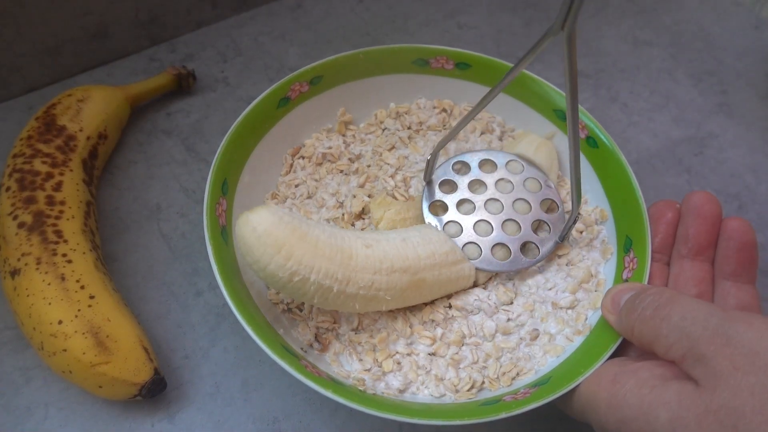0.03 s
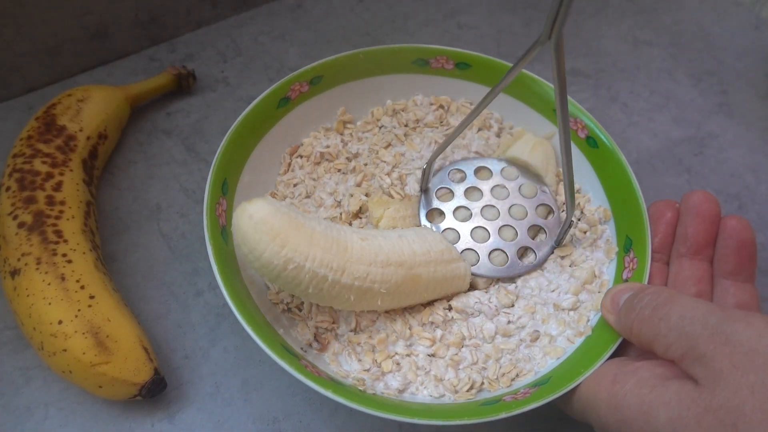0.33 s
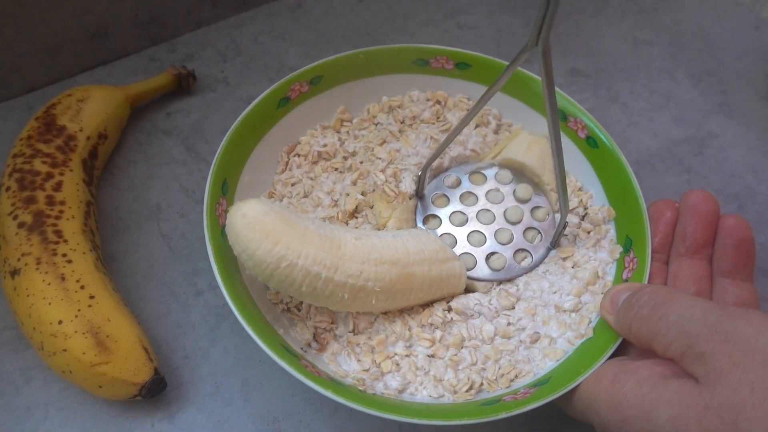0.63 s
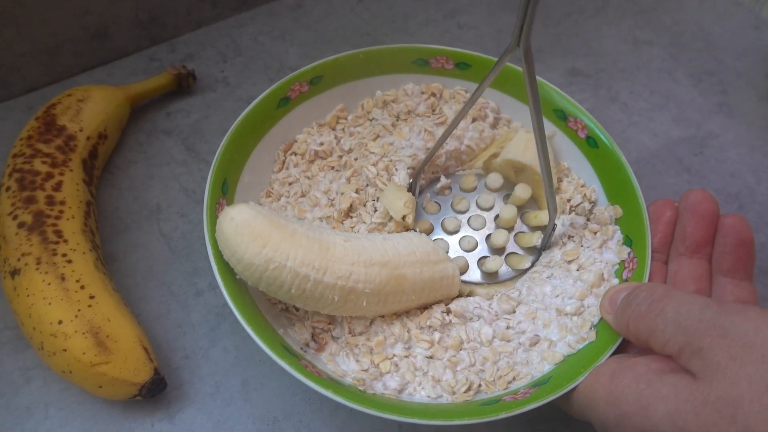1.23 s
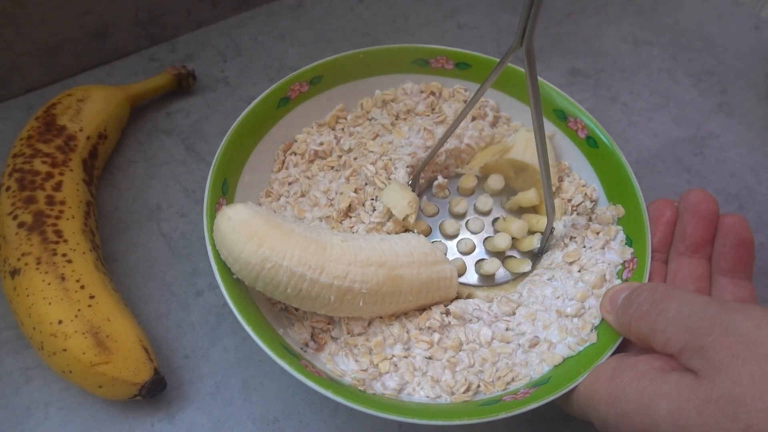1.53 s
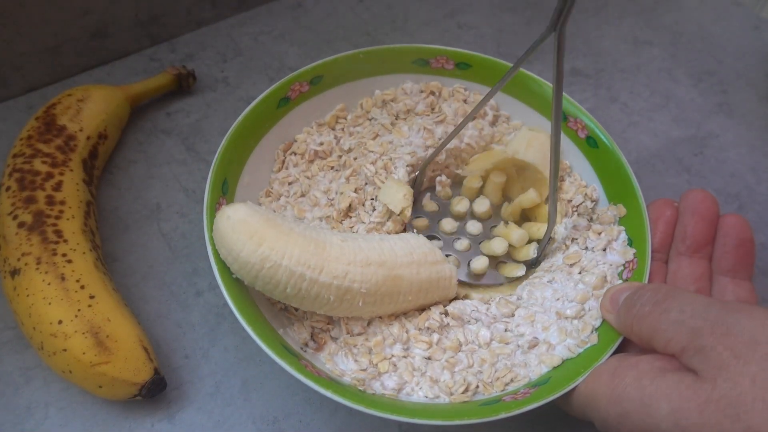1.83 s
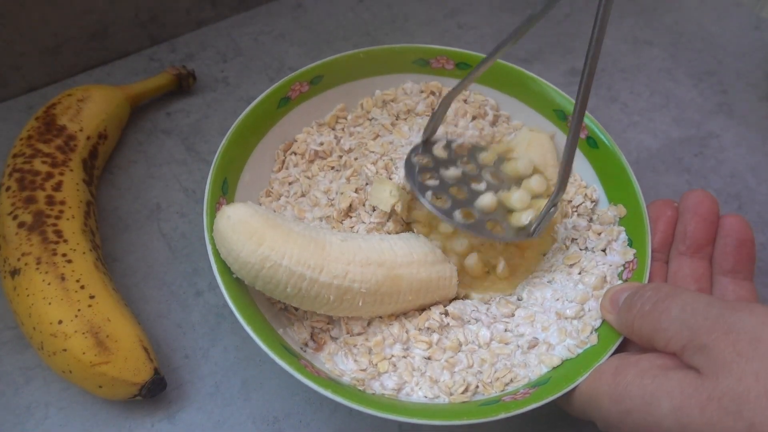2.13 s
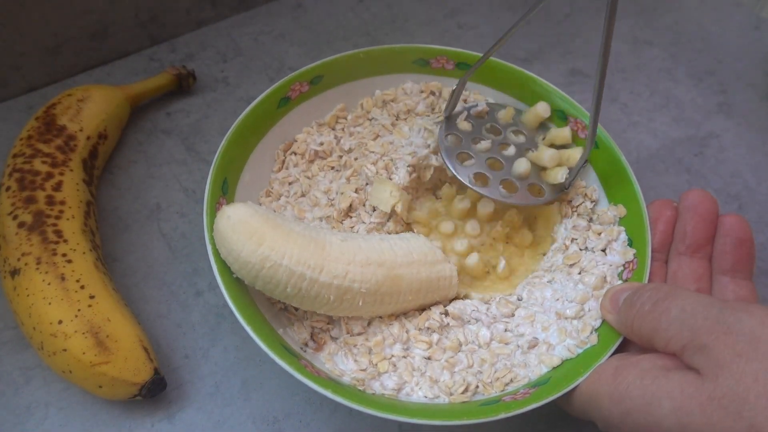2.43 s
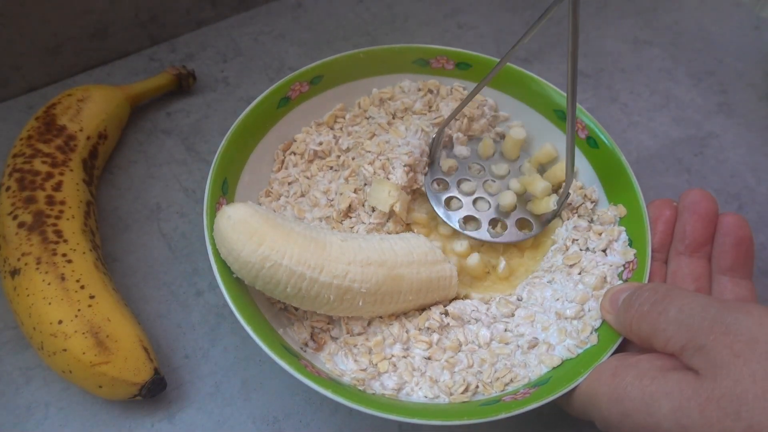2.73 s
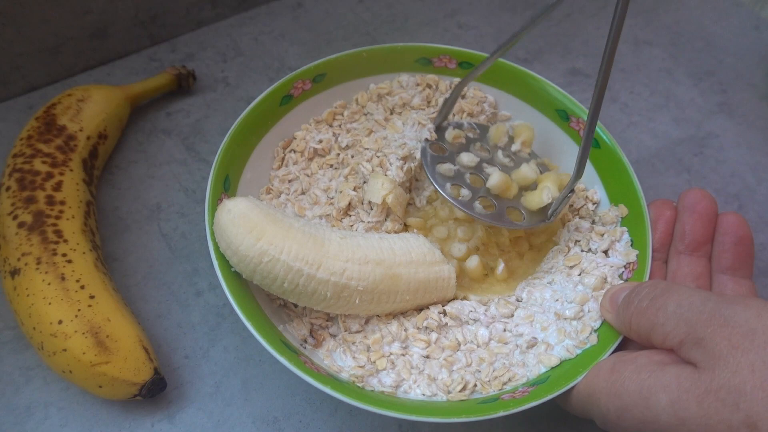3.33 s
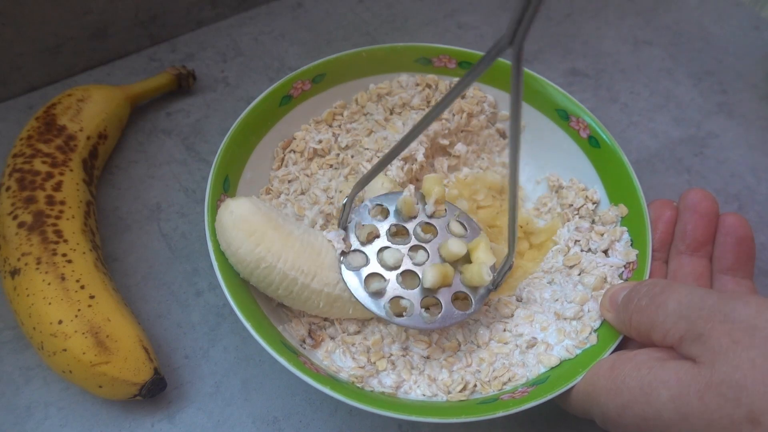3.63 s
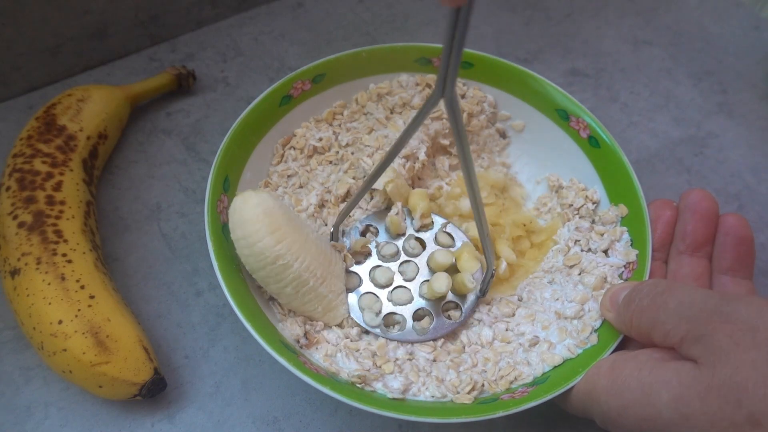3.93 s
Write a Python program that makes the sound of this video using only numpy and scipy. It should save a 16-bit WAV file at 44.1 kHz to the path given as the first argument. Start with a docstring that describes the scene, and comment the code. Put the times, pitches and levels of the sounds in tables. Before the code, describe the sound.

Banana and dry oats being mashed in a bowl, with soft crackles, thuds and a clink.

```python
"""A bowl rocks and thuds on a kitchen counter as a steel masher presses banana into dry oats. Breaking flakes
and sticky pulp crackle, and banana squelches through the masher's holes. The masher taps softly and clinks on
the rim as it lifts, and the bowl knocks hard on the counter twice. It all sounds close, with the low boom and
short echo of a small hard room and a faint hiss and hum."""
import sys
import numpy as np
from scipy import signal
from scipy.fft import rfft, irfft
from scipy.io import wavfile
from scipy.ndimage import uniform_filter1d

SR = 44100
rng = np.random.default_rng(int(sys.argv[2]) if len(sys.argv) > 2 else 0)


def unload_wav(signal):
    """Save mono or channel-first audio to the path in sys.argv[1] as 16-bit WAV at rate SR, clipped to [-1, 1]."""
    wavfile.write(
        sys.argv[1],
        SR,
        np.round(np.clip(np.atleast_2d(signal).T, -1, 1) * 32767).astype(np.int16),
    )


N = 176400  # 4 seconds

# Tones a knock sets ringing, the room's low boom (first five) and the bowl's short, higher ring:
# pitch_hz, level_db, fade_s (time to fall by 60 dB)
KNOCK_TONES = [(74.6, -6, .2), (107.8, -9, 0.32), (160, -7.5, 0.18), (236, -7.5, 0.25), (291, -4.5, 0.18),
               (323.4, -3.5, 0.084), (375, 2, .05), (471, 0.5, 0.033), (560, 1, 0.046), (730, -5, 0.029),
               (815.5, -5, 0.047), (901, -8.5, 0.045), (1377, -15, 0.051), (1620, -12, 0.016)]
# Knocks of the bowl: start_s, level_db, cut_above_hz, cut_below_hz
BOWL_KNOCKS = [(.066, -33.5, 276, 35), (0.238, -38.5, 440, 35), (.470, -35.5, 420, 35),
               (.606, -42, 400, 35), (0.866, -34.5, 298, 40), (0.913, -37, 259, 101), (.985, -46, 220, 180),
               (1.21, -59, 128, 80), (2.034, -25, 710, 370), (2.041, -31.5, 607, 90.5),
               (3.255, -16, 1310, 246), (3.2609, -19.5, 1220, 198), (3.608, -23, 1250, 130),
               (3.6233, -27.5, 815, 77)]
# Gritty contact noise of the bowl striking the counter in each knock: pitch_hz, level_db
GRIT_COLOUR = [(150, -3.5), (600, 8), (1200, -3), (2000, -4), (3000, -3), (5000, -6), (12000, 6)]
# The steel masher's ringing tones: pitch_hz, level_db, fade_s
MASHER_TONES = [(1983, -1.5, 0.065), (2590, -16, 0.071), (3040, 5, 0.061), (3580, -8, 0.077),
                (3590, 8, 0.048), (4050, 6, 0.046), (4750, 5.5, 0.047), (4887, 9, 0.056), (5030, 10, .05),
                (5000, -7, 0.044), (6400, 5.5, 0.071), (6580, 7, 0.038), (8870, 3, 0.042),
                (10780, 3.5, 0.033)]
# Sharp crack of steel on the rim: pitch_hz, level_db
CRACK_COLOUR = [(50, -48), (120, -1.5), (300, 1.5), (700, -9.5), (1600, -4), (3500, -3), (5300, -8.5),
                (7000, -13.5), (10000, -18), (13500, -26.5), (16000, -38)]
# The masher's tap, deadened by pulp: pitch_hz, level_db
TAP_COLOUR = [(100, -20), (400, -9), (900, -5), (1300, -9.5), (1800, -1.5), (2400, -5.5), (3400, -1),
              (4600, -2.5), (6500, -13), (10000, -18.5), (16000, -17)]
# Single snaps of flakes and pulp: start_s, level_db, low_part_db, top_part_db
FLAKE_SNAPS = [(0.179, -32, -41, -27), (0.2657, -43, -21, -8), (0.279, -41.5, -11, -12),
               (0.3037, -31, -31, -9.5), (0.4599, -33.5, -25, -19.5), (0.5462, -33, -21, -19.5),
               (0.814, -32, -29, -10.5), (0.8676, -32.5, -17.5, -14.5), (0.9645, -25, -33.5, -22),
               (1.1886, -33, -25, -24), (1.3055, -41, -14.5, -5), (1.6527, -35, -17, -20),
               (1.778, -33.5, -18, -9), (1.8146, -36.5, -13, -11), (1.8345, -27, -23.5, -3.5),
               (1.8704, -28, -26, -7), (1.8998, -25, -25, -11.5), (1.9223, -32, -33, -12),
               (2.0062, -26.5, -30, -22), (2.0955, -45, -12, 3), (2.5645, -23, -25.5, -13),
               (2.653, -32, -15.5, -13.5), (2.7431, -31.5, -19, -6.5), (2.7827, -38, -3.5, -11),
               (2.7928, -20, -17.5, -13), (2.821, -26.5, -24, -23), (2.8837, -32, -13.5, -5.5),
               (2.893, -22, -21.5, -10.5), (3.022, -27, -18, -11.5), (3.036, -30, -32, -7.5),
               (3.0841, -22, -22, -14.5), (3.1347, -25.5, -37, -8.5), (3.142, -22, -39, -15),
               (3.1572, -14.5, -48, -24), (3.1682, -21, -27, -13), (3.1749, -12, -48, -27),
               (3.1936, -22.5, -45, -9), (3.2208, -27.5, -27, -10), (3.454, -52, 1, -6),
               (3.6225, -29, -14.5, -14), (3.6414, -26.5, -15.5, -20), (3.6516, -22.5, -39, -10),
               (3.664, -34, -31, -10), (3.684, -25.5, -36, -12), (3.7824, -31, -23, -5.5),
               (3.803, -28, -23, -31), (3.8316, -27.5, -35, -21), (3.8983, -39, -16, -12),
               (3.9766, -31, -26, -15), (3.9904, -23, -16.5, -19.5)]
# How hard the oats are crushed: time_s, level_db
CRUSH_LEVELS = [(0, -63.5), (.2, -61.5), (.32, -53.5), (.42, -65), (.55, -57), (.72, -62.5), (.83, -54.5),
                (1.05, -63.5), (1.45, -63), (1.74, -65), (1.88, -46.5), (1.96, -66), (2.029, -49),
                (2.12, -62.5), (2.34, -79.5), (2.6, -54.5), (2.7, -47), (2.77, -56), (2.9, -54),
                (2.96, -61.5), (3.07, -53.5), (3.16, -42), (3.21, -53.5), (3.24, -38.5), (3.31, -72.5),
                (3.59, -66.5), (3.65, -50), (3.79, -47.5), (3.91, -60.5), (3.99, -46)]
# One tiny break in a flake: pitch_hz, level_db
GRAIN_COLOUR = [(150, -30), (500, 4.5), (1000, -2), (2200, -3), (4000, 4), (6300, 0.5), (10000, 3.5),
                (15500, -7.5)]
# Pulp squeezed against the bowl: pitch_hz, level_db
PULP_COLOUR = [(30, -64), (110, -16), (220, -0.5), (350, 2), (550, -0.5), (750, -18), (1200, -8.5),
               (2500, -17)]
# How loud the pulp squelches: time_s, level_db
SQUELCH_LEVELS = [(0, -67.5), (.8, -67), (1.3, -73.5), (1.75, -68.5), (1.92, -52), (2.03, -51),
                  (2.1, -69.5), (2.6, -56.5), (2.95, -77), (3.0, -55), (3.05, -63.5), (3.16, -50.5),
                  (3.25, -55), (3.35, -66), (3.6, -65.5), (3.75, -52), (4, -56)]
# How long the room echoes: pitch_hz, fade_s
ROOM_FADES = [(100, 0.28), (260, 0.4), (700, 0.25), (1800, 0.33), (5000, 0.28), (13000, 0.27)]
# The room's hiss: pitch_hz, level_db
HISS_COLOUR = [(15, -79), (25, -9.5), (97, 3), (212, 3), (384, -13), (560, -1.5), (695, -17), (887, -5),
               (1040, -18), (1330, -10.5), (3520, -23.5), (3820, -24), (6920, -40), (13600, -23.5),
               (16000, -21)]
# The room's low hum: pitch_hz, width_hz, level_db
HUM_BANDS = [(116.7, 10, -63), (220, 20, -62.5)]

TAP_AT_S, CLINK_AT_S = .0464, 2.3682
GRAINS_PER_S, SLIPS_PER_S = 850, 600
POP_LOW_HZ, POP_HIGH_HZ = 1480, 8650


def bowl_knocks():
    """The bowl knocks on the counter and rings, and the room booms; a softer push sounds duller."""
    out, tones = np.zeros((2, N)), ring(KNOCK_TONES)
    for start_s, level_db, cut_above_hz, cut_below_hz in BOWL_KNOCKS:
        knock = tones.copy()
        grit = colour(burst(fall_s=.0042), GRIT_COLOUR)
        add(knock, 0, 20 * gain(-9.5) * grit)
        knock = cut(knock, cut_above_hz, "low")
        knock = cut(knock, cut_below_hz, "high")
        add(out, start_s, gain(level_db) * inside_bowl(knock))
    return room_echo(out, out[0], echo_db=-5)


def masher_hits():
    """Steel meets the bowl: a dead tap in the pulp, later a crack and a short ring on the rim."""
    tap, clink = np.zeros((2, N))
    add(tap, TAP_AT_S, 2 * gain(-8) * colour(burst(fall_s=.00087), TAP_COLOUR))
    add(clink, CLINK_AT_S, gain(-34) / 2 * ring(MASHER_TONES))
    add(clink, CLINK_AT_S, 2 * gain(-7) * colour(burst(fall_s=.0016), CRACK_COLOUR))
    return (room_echo(inside_bowl(tap), tap, echo_db=-5.5)
            + room_echo(inside_bowl(clink), clink, echo_db=7, swell_s=.014))


def flake_snaps():
    """Single flakes break and sticky pulp lets go of the steel."""
    out = np.zeros((2, N))
    for start_s, level_db, low_db, top_db in FLAKE_SNAPS:
        tone = [(300, low_db - 22), (1000, low_db + .5), (2200, low_db + 8.5),
                (6000, -10), (12000, top_db)]
        snap = colour(burst(fall_s=.00054, rise_s=.00107), tone)
        add(out, start_s, gain(level_db + 17.5) * inside_bowl(snap))
    return room_echo(out, out[0], echo_db=-10)


def oat_crackle():
    """Countless tiny breaks come at random, louder when the oats are crushed harder."""
    grains, out = [oat_grain() for _ in range(60)], np.zeros((2, N))
    sizes = gain(4.05 * np.minimum(rng.exponential(size=N), 4))  # many small, few large
    for i in np.flatnonzero(rng.random(N) < GRAINS_PER_S / SR):
        add(out, i / SR, sizes[i] * grains[i % len(grains)])
    out *= follow(CRUSH_LEVELS) / out[0].std()
    return room_echo(out, out[0], echo_db=-9.5)


def oat_grain():
    """One tiny break, with an air pocket in the pulp popping at a random pitch."""
    pitch_hz = POP_LOW_HZ * (POP_HIGH_HZ / POP_LOW_HZ) ** rng.random()
    crack = colour(burst(fall_s=.0003), GRAIN_COLOUR)
    pop = ring([(pitch_hz, -8.5, .0047)])
    return inside_bowl(crack + pop[:len(crack)])


def pulp_squelch():
    """Banana slips through the masher's holes in many soft, low bursts."""
    slips = rng.standard_normal(N) * (rng.random(N) < SLIPS_PER_S / SR)
    squelch = gain(.5) * follow(SQUELCH_LEVELS) * normalise(colour(slips, PULP_COLOUR))
    return room_echo(inside_bowl(squelch), squelch, echo_db=-5)


def inside_bowl(sound):
    """The bowl's walls scatter a sound. Gives mid (what both ears share) and side (how they differ)."""
    heard = []
    for direct in ([0, 1, 0], [.25, 0, -.25]):  # the straight path: mid, then side
        scatter = cut(burst(fall_s=.0025), 1520, "high")
        paths = gain(-1) * scatter / np.linalg.norm(scatter)
        add(paths, 0, np.array(direct))
        heard.append(signal.fftconvolve(sound, paths)[:N])
    mid, side = heard
    return np.array([mid, rng.choice([-1, 1]) * side])


def room_echo(near, source, echo_db, swell_s=.0035):
    """Hard walls add the source's echo to its near mid and side. Gives left and right."""
    t = np.arange(32768) / SR
    hz = np.fft.rfftfreq(len(t), 1 / SR)
    spectra, tails = rfft(rng.standard_normal((2, len(t)))), 0
    for pitch_hz, fade_s in ROOM_FADES:
        band = lookup(hz, [(f, f == pitch_hz) for f, _ in ROOM_FADES])
        tails = tails + irfft(spectra * band) * fade(t, fade_s)
    swell = 1 - np.exp(-(t / swell_s) ** 2)
    tails = [even_out(tail * swell, bins=25) * (t < .5) for tail in tails]
    echo = np.array([signal.fftconvolve(source, tail / np.linalg.norm(tail))[:N] for tail in tails])
    return stereo(*(near + gain(echo_db) * echo))


def room_hiss():
    """The room has a faint, steady hiss and a low hum."""
    mid, side = (gain(-62) * normalise(colour(rng.standard_normal(N), HISS_COLOUR)) for _ in range(2))
    for pitch_hz, width_hz, level_db in HUM_BANDS:
        band = signal.iirpeak(pitch_hz, pitch_hz / width_hz, SR)
        hum = signal.lfilter(*band, rng.standard_normal(N))
        mid += gain(level_db) * normalise(hum)
    return stereo(mid, 2.54 * side)  # extra side makes the hiss wide


def ring(tones):
    """Tones that start together and fade; neighbouring tones swing in opposite directions."""
    t = np.arange(SR // 2) / SR
    return sum((-1) ** k * gain(level_db) * np.sin(2 * np.pi * pitch_hz * t) * fade(t, fade_s)
               for k, (pitch_hz, level_db, fade_s) in enumerate(tones))


def burst(fall_s, rise_s=0):
    """A tiny break or hit: noise that leaps up and dies at once."""
    t = np.arange(2048) / SR - rise_s
    shape = np.exp(np.where(t < 0, 10 * t, -t) / fall_s)
    noise = even_out(rng.standard_normal(len(t)) * shape, bins=7)
    noise *= np.minimum(10 * shape, 1)  # keep both ends quiet
    return noise * np.linalg.norm(shape) / np.linalg.norm(noise) / 2


def even_out(noise, bins):
    """Flatten chance bumps in a noise's tone, keeping its energy."""
    spectrum = rfft(noise)
    power = uniform_filter1d(np.abs(spectrum) ** 2, bins)
    flat = irfft(spectrum / np.sqrt(power + 1e-12))
    return flat * np.linalg.norm(noise) / np.linalg.norm(flat)


def colour(sound, points):
    """Make each pitch louder or softer along (pitch_hz, level_db) points."""
    size = 4096
    gains = gain(lookup(np.fft.rfftfreq(size, 1 / SR), points))
    # Fold the filter in time so nothing is heard before the sound starts.
    folded = irfft(np.log(gains))
    folded[1:size // 2] *= 2
    folded[size // 2 + 1:] = 0
    response = irfft(np.exp(rfft(folded)))
    return signal.fftconvolve(sound, response)[:len(sound)]


def cut(sound, hz, keep, order=2):
    """Keep the "low" or the "high" side of a pitch."""
    return signal.sosfilt(signal.butter(order, hz, keep, fs=SR, output="sos"), sound)


def stereo(mid, side):
    """Left and right: alike in the bass, different in the treble."""
    side = cut(side, 2680, "high", order=1) + .13 * side
    return np.array([mid + side, mid - side])


def add(track, start_s, sound):
    """Mix a sound into a track at a given time."""
    part = track[..., int(start_s * SR):][..., :sound.shape[-1]]
    part += sound[..., :part.shape[-1]]


def lookup(hz, points):
    """Read between (pitch_hz, value) points, with octaves evenly spaced."""
    pitches, values = np.array(points, float).T
    return np.interp(np.log(hz + 1e-3), np.log(pitches), values)


def follow(points):
    """A volume that glides through (time_s, level_db) points."""
    return gain(np.interp(np.arange(N) / SR, *np.array(points).T))


def fade(t, fade_s):
    """A volume that falls by 60 dB every fade_s."""
    return gain(-60 * t / fade_s)


def gain(db):
    """Turn decibels into a multiplier."""
    return 10 ** (np.asarray(db) / 20)


def normalise(sound):
    """Scale to an average power of one."""
    return sound / np.sqrt(np.mean(sound ** 2))


def scene():
    """Everything heard at the counter."""
    return bowl_knocks() + masher_hits() + flake_snaps() + oat_crackle() + pulp_squelch() + room_hiss()


def record(dry):
    """Trim the deepest bass and the highest treble."""
    treble_cut = signal.ellip(10, .2, 80, 15800, fs=SR, output="sos")
    return signal.sosfilt(treble_cut, cut(dry, 12, "high"))


dry = scene()
out = record(dry)
unload_wav(out)
```